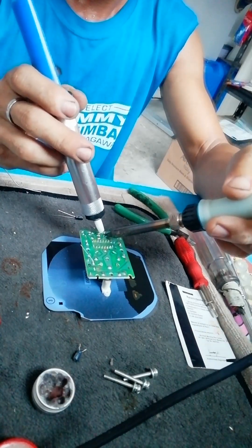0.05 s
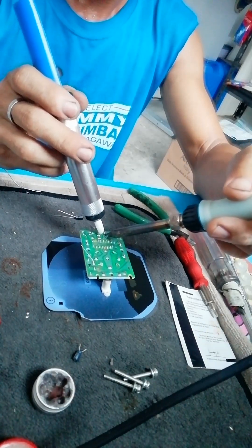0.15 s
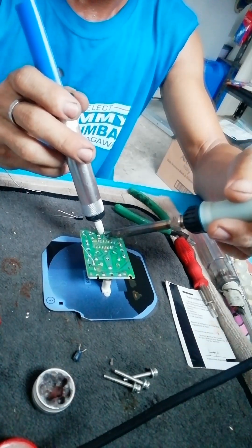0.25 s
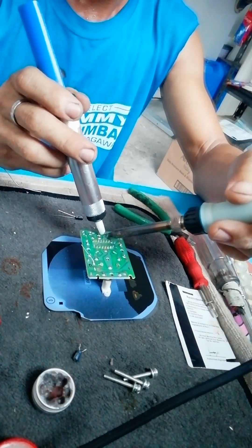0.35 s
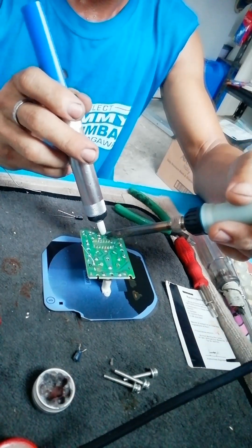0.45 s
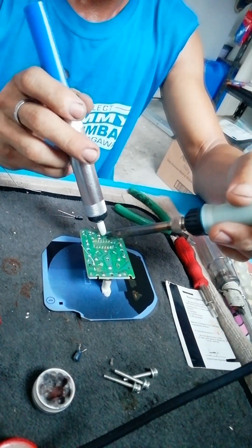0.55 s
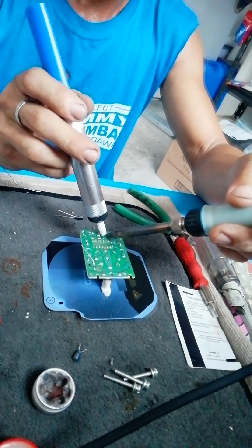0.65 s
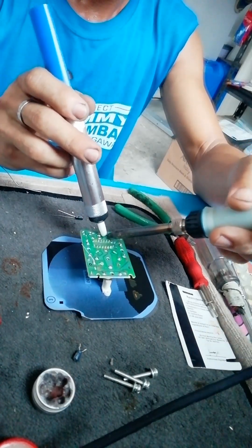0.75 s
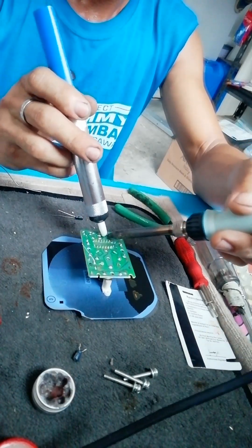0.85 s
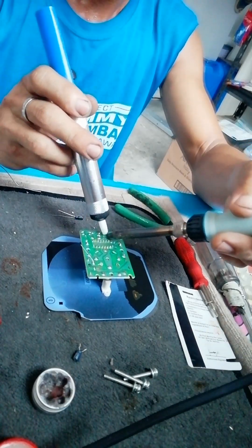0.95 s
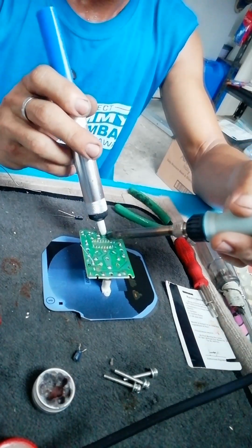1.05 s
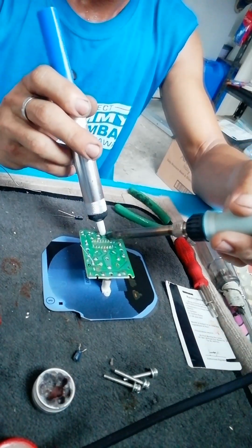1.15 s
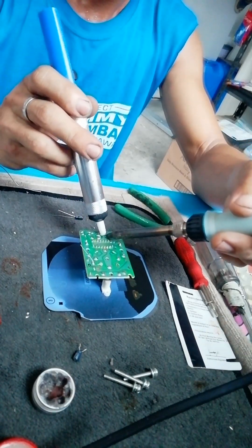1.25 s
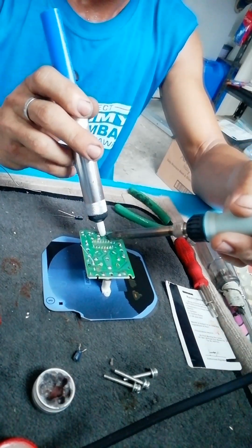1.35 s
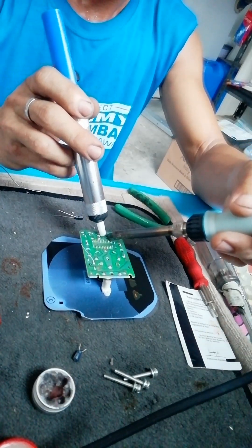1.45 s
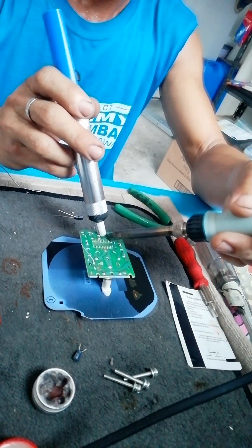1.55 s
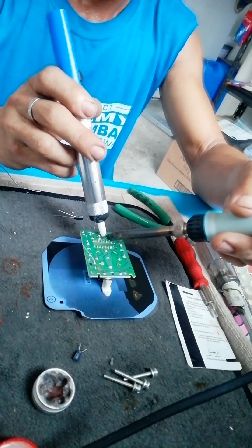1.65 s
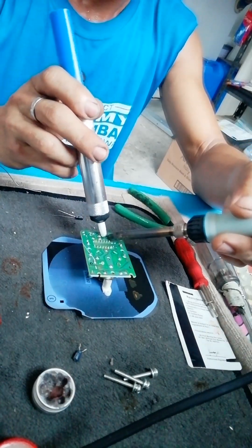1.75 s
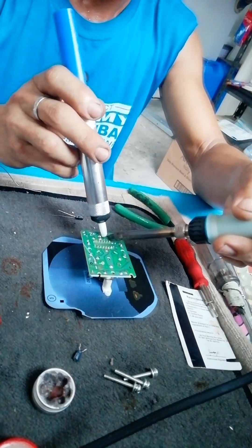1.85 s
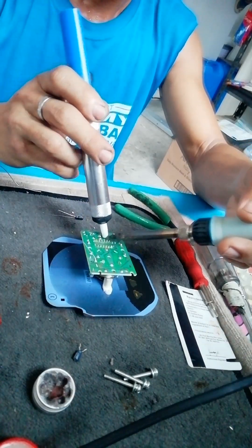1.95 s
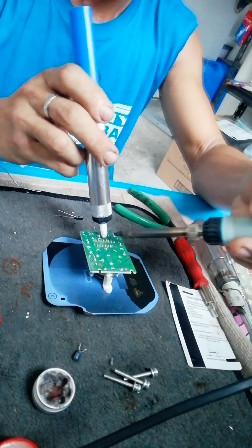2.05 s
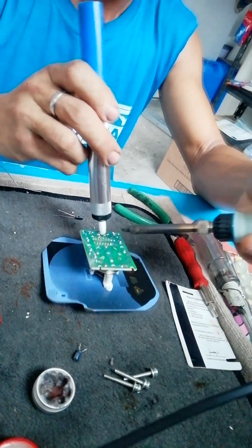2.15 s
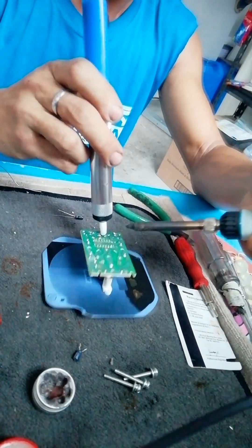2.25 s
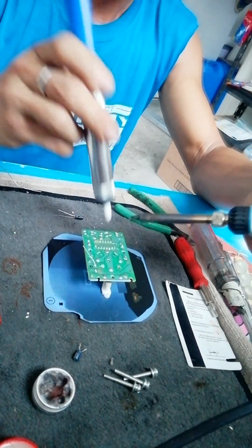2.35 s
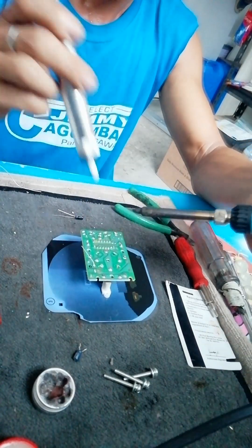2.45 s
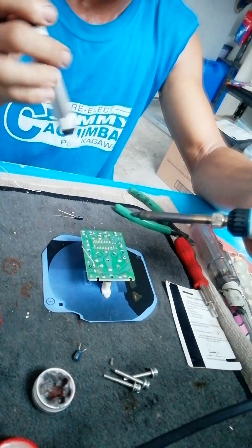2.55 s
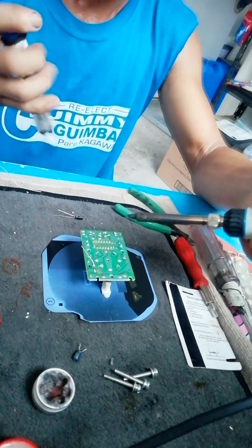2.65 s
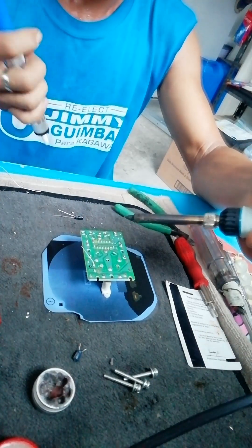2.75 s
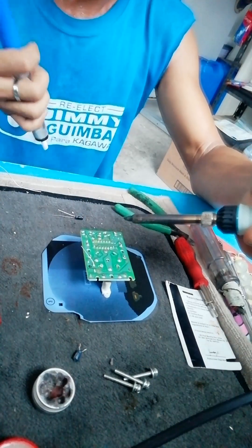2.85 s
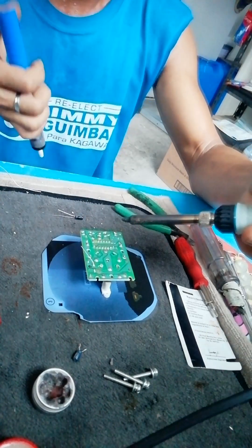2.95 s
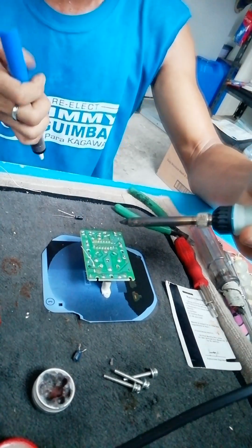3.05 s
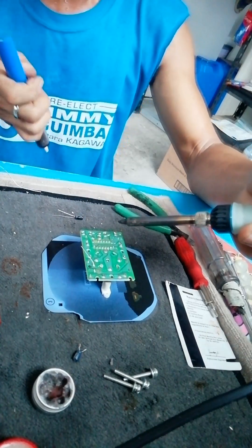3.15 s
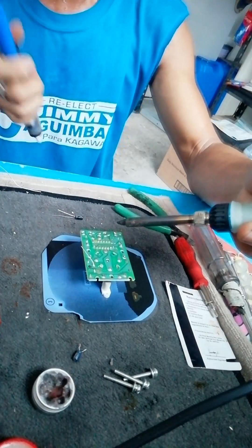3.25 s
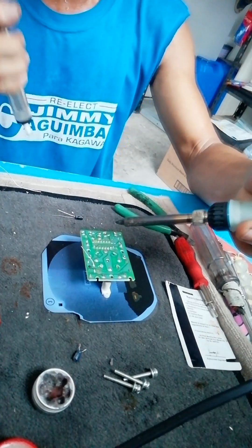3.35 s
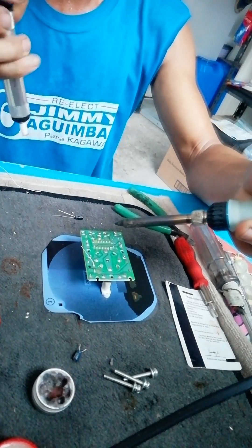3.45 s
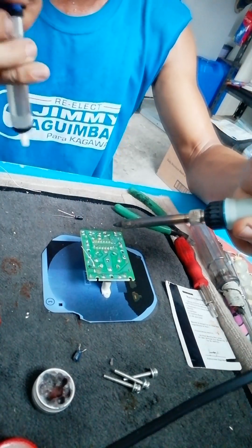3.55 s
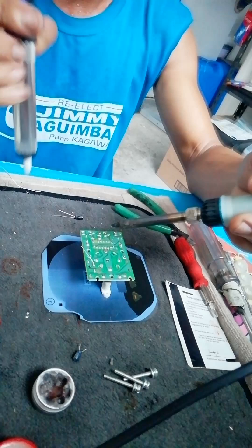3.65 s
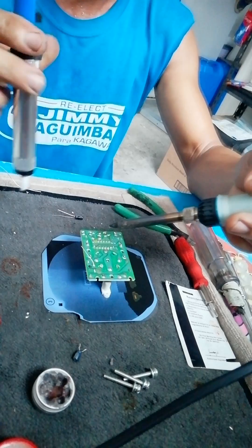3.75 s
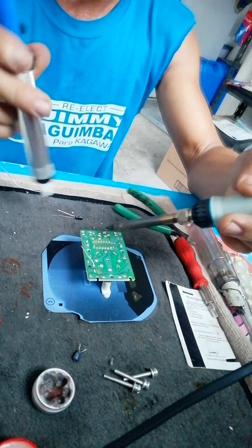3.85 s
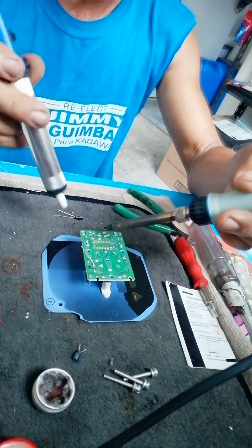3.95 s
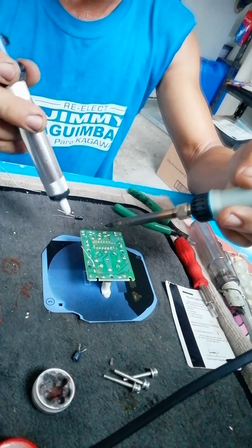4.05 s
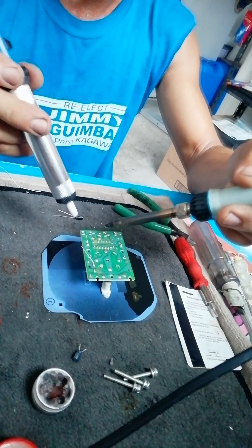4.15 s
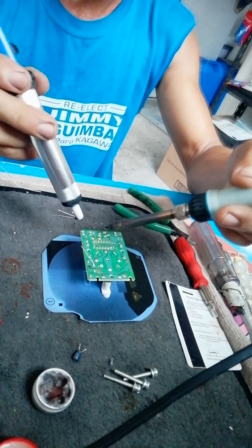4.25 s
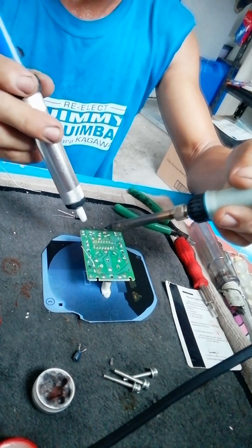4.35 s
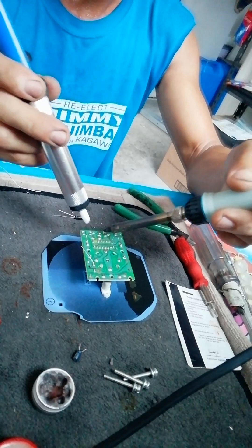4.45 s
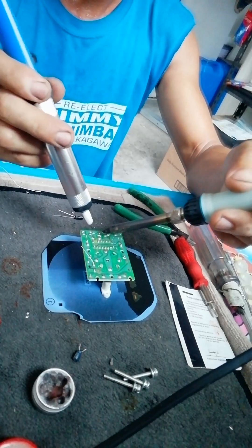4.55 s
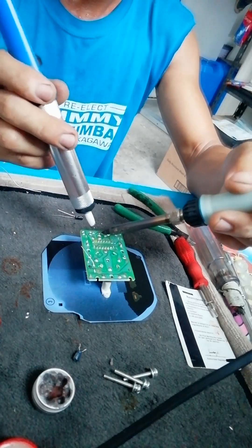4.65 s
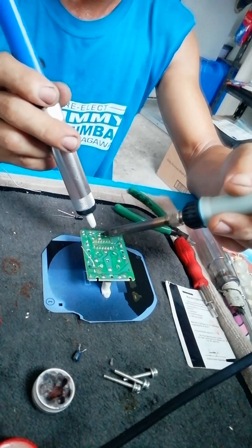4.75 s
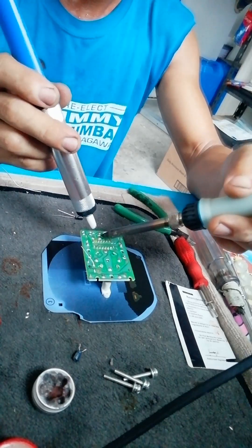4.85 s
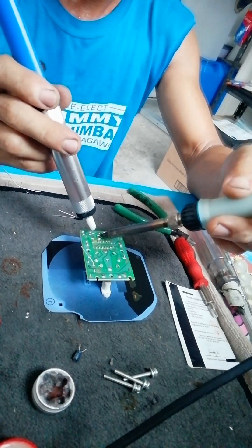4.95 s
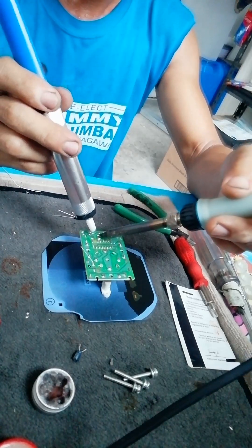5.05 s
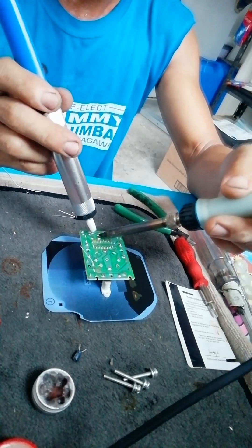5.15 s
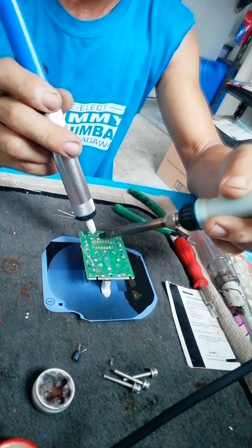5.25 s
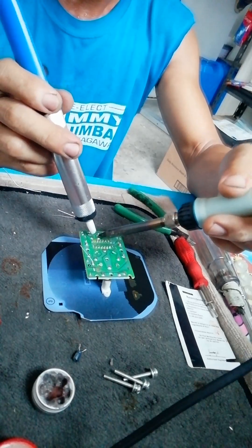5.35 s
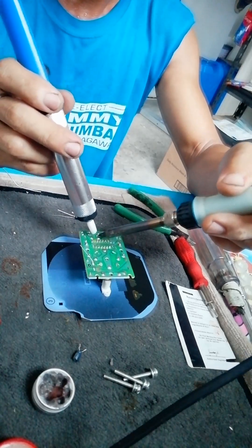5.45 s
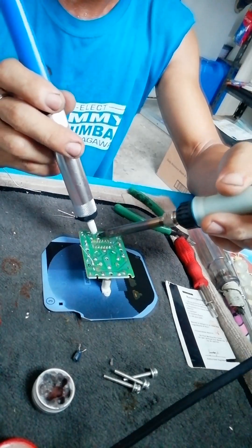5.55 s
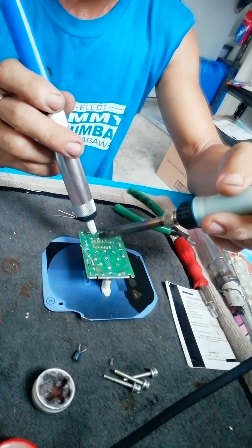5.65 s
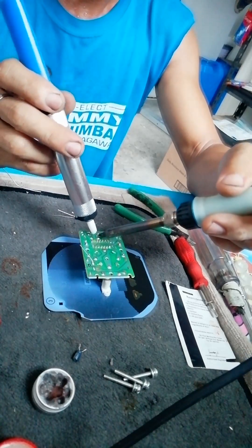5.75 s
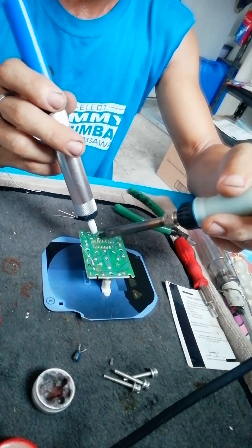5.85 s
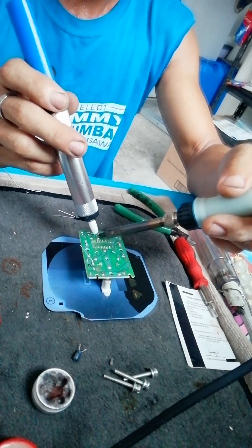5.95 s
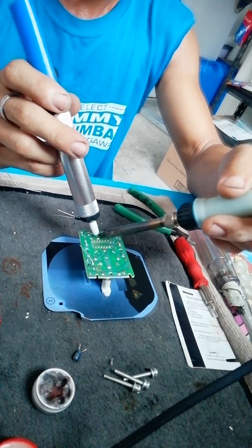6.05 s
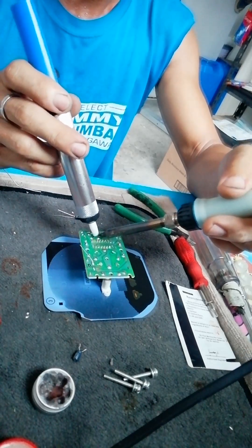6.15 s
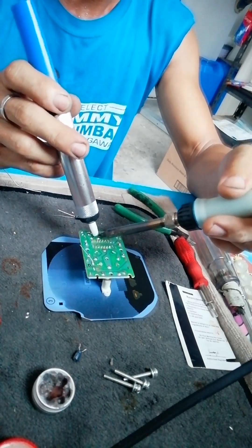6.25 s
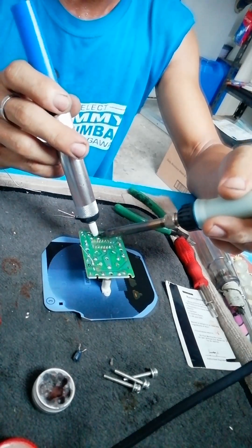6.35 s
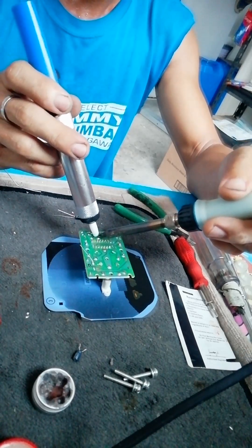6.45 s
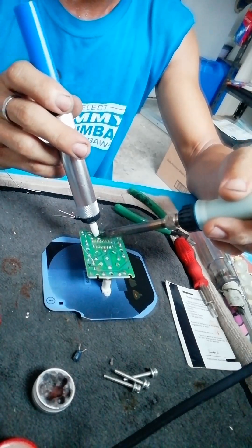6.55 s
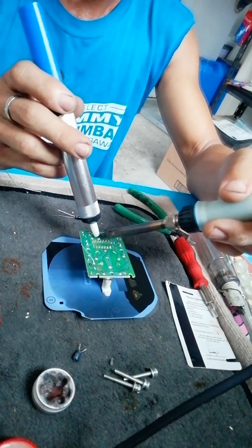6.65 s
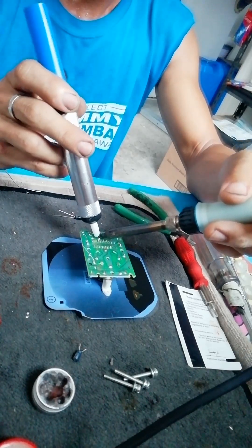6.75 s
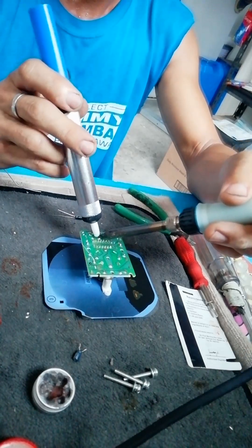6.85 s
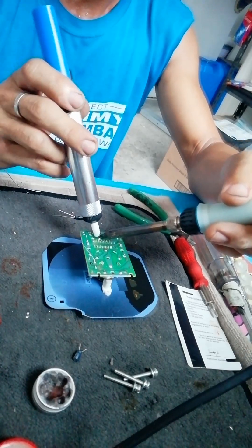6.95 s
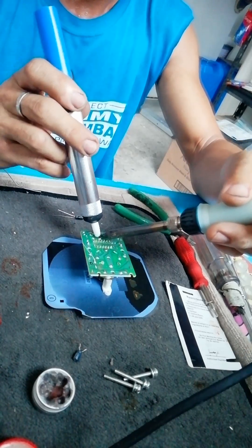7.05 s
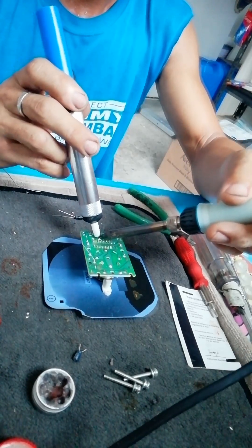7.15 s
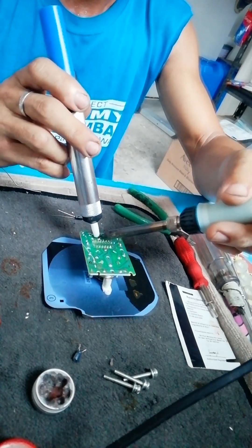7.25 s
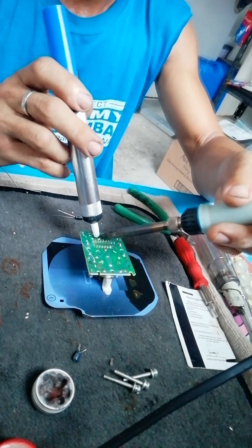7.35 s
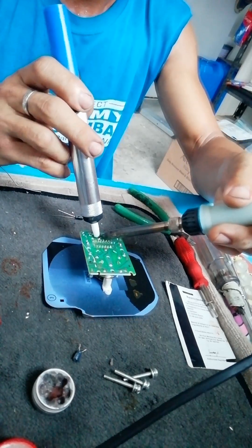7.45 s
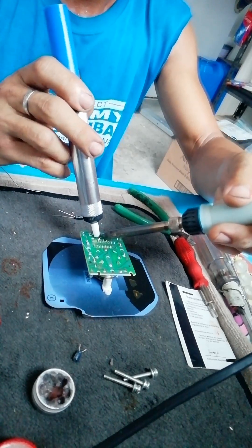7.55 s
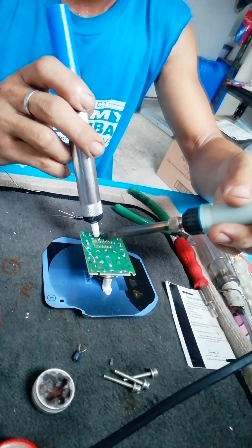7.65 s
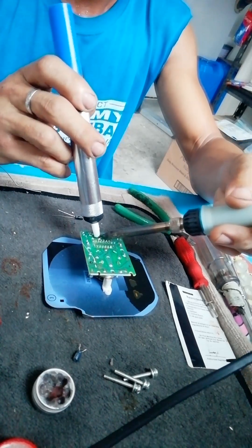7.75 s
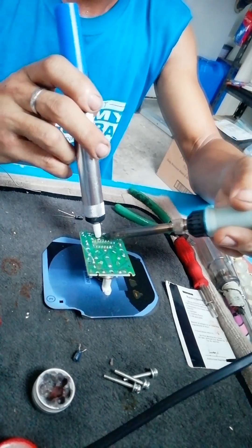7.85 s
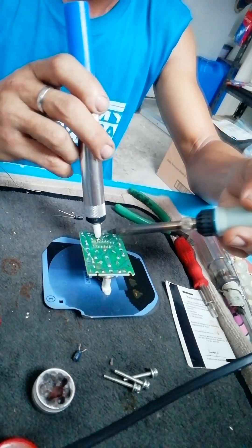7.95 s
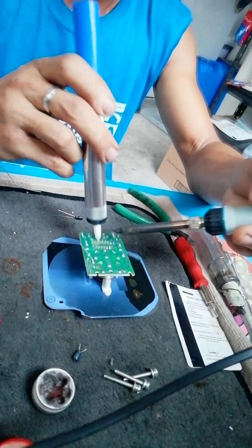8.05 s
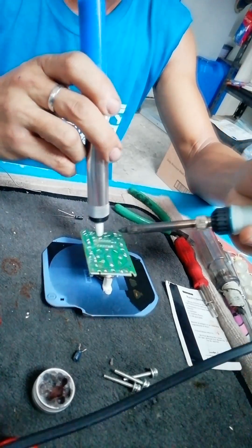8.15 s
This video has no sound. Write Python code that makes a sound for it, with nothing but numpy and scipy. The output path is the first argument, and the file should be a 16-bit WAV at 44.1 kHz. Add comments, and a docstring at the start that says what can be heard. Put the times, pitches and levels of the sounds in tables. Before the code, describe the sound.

A spring pump snaps on a circuit board, gets pushed back into its latch, and snaps once more above a humming, softly scraping fan.

```python
"""A fan whirrs and hums in moving air, in a small hard room; its rub scrapes once a turn over mains hum.
Close to a two-port phone on the workbench, a spring-loaded desoldering pump fires, is cocked and fires again.
Each shot is a rush of friction noise, then hard clicks through metal and circuit-board resonances.
Flux hisses once as shaped noise; bumps of the bench are low decaying swings."""
import sys
import numpy as np
from scipy import signal
from scipy.fft import rfft, irfft, next_fast_len
from scipy.io import wavfile
from scipy.ndimage import uniform_filter1d

SR = 44100
rng = np.random.default_rng(int(sys.argv[2]) if len(sys.argv) > 2 else 0)


def digitize_waveform(pressure):
    """Quantize a signal to 16-bit integers and store it at the path in sys.argv[1].

    Rows of a 2-D input are taken as channels; values are limited to [-1, 1].
    """
    field = np.atleast_2d(pressure).T
    bounded = np.clip(field, -1, 1)
    quanta = np.round(bounded * 32767).astype(np.int16)
    wavfile.write(sys.argv[1], SR, quanta)


N = 361238
TIME = np.arange(N) / SR  # s
BLOW_SIZE = 2 ** 15  # samples in one blow, swing or echo tail
BLOW_TIME = np.arange(BLOW_SIZE) / SR  # s

# Broad resonances of the pump barrel. Each row: centre in Hz, width in Hz, level in dB before the duller top.
BARREL_MODES = [(2170, 160, -12), (3460, 260, 4), (4740, 490, 0.5), (5600, 510, -6), (8400, 2100, -3),
                (9150, 900, -10), (13000, 6100, -14.5)]


def undb(db):
    """Decibels to gain."""
    return 10 ** (np.asarray(db) / 20)


def unit(x):
    """Scale to rms 1."""
    return x / np.sqrt(np.mean(x ** 2))


def bins(size):
    """Frequencies of a spectrum in Hz, kept at 1 or above."""
    return np.maximum(np.fft.rfftfreq(size, 1 / SR), 1)


def shape(points, hz):
    """Gain of a (Hz, dB) curve, drawn straight over log frequency."""
    f, db = np.transpose(points)
    return undb(np.interp(np.log(hz), np.log(f), db))


def resonance(hz, centre, width):
    """Complex response of one resonance, 1 at its centre."""
    return 1 / (1 + 1j * (hz ** 2 - centre ** 2) / (hz * width))


def causal(gain):
    """The minimum-phase response with this gain: nothing sounds before the blow."""
    cepstrum = irfft(np.log(gain + 1e-9))
    half = len(cepstrum) // 2
    return np.exp(rfft(np.r_[cepstrum[0], 2 * cepstrum[1:half], np.zeros(half)]))


def noise(gain_at):
    """Two unrelated noises with the given colour, scaled together to rms 1."""
    size = next_fast_len(N, real=True)
    spectrum = rfft(rng.standard_normal((2, size))) * gain_at(bins(size))
    return unit(irfft(spectrum, size)[:, :N])


def walk(rate):
    """Slow chance with a spread near 1, drawn anew `rate` times a second and smoothed."""
    k = int(SR / rate)
    steps = np.repeat(rng.standard_normal(N // k + 1), k)
    return 1.3 * uniform_filter1d(steps, k)[:N]


def add(out, start, sound):
    """Mix a sound in at a time in seconds."""
    i = int(start * SR)
    out[:, i:i + sound.shape[-1]] += sound[..., :max(N - i, 0)]


def air(level_db=-48.5, swell_db=0.78, lag=.00075, aimed=0.31):
    """Moving air: bass alike in both ports, higher bands wider; a draught from the left reaches the right late."""
    # Colour of the air. Each row: frequency in Hz, relative level in dB per Hz.
    air_colour = [(12, -31), (22, 1), (65, -5.5), (100, -1.5), (150, -10), (220, -12), (340, -17.5),
                  (600, -27.5), (1030, -23), (1650, -23), (2600, -29), (5500, -37), (8700, -37.5),
                  (11000, -47.5), (16000, -52.5)]
    # Stereo width of the air before the draught. Each row: frequency in Hz, side minus mid in dB.
    air_width = [(30, -37), (120, -24), (290, -8.5), (480, 3), (680, 7.5), (1000, -3.5), (1400, -4.5),
                 (2100, 1), (3000, 0), (15000, 0.5)]
    mid = noise(lambda hz: shape(air_colour, hz))
    side = irfft(rfft(mid[1]) * shape(air_width, bins(N)), N)
    draught = noise(lambda hz: shape(air_colour, hz))[0]
    draught = signal.sosfilt(signal.butter(2, 220, "high", fs=SR, output="sos"), draught)
    late = np.roll(draught, int(lag * SR))
    ports = mid[0] + np.array([side, -side]) + aimed * np.array([draught, late])
    return ports * undb(level_db + swell_db * walk(3.03))


def hum(waver_db=2, drift=0.56):
    """Lines of mains and motor: sines that waver a little in level and phase (drift in radians)."""
    # Mains and motor lines. Each row: frequency in Hz, rms level in dB about which it wavers.
    hum_lines = [(46.7, -61.5), (91, -62), (118.6, -54), (328, -70.5), (490, -76.5), (981, -75),
                 (1125, -74), (1577, -77), (1658, -73.5), (1922, -79)]
    out = 0
    for hz, db in hum_lines:
        level = np.sqrt(2) * undb(db + waver_db * walk(4.7))
        out = out + level * np.sin(2 * np.pi * hz * TIME + drift * walk(4))
    return out


def blades(rate_hz=69.9, first_db=-64, db_per_octave=-4, waver_db=2.3, wide_hz=420, count=17):
    """The passing blades hum in overtones; the higher ones reach the two ports out of step."""
    out = 0
    for k in range(1, count):
        hz = k * rate_hz
        apart = np.pi / 3 / (1 + (wide_hz / hz) ** 3) * rng.choice([-1, 1])
        phase = 2 * np.pi * (hz * TIME + rng.random()) + .4 * walk(3)
        level = undb(first_db + db_per_octave * np.log2(k) + waver_db * walk(3))
        out = out + np.sin(phase + np.array([[apart], [-apart]])) * level
    return np.sqrt(2) * out


def fan(turns_per_s=5.85, uneven_db=0.5, wander=0.0117, blur_hz=120, overtone_db=-9, leak_db=-9):
    """Once a turn a dry rub gives one rising and one falling whirr and a scrape, coloured by the housing."""
    # Resonances of the fan housing. Each row: centre in Hz, width in Hz, level in dB.
    housing_modes = [(893, 180, 0.5), (1163, 93, 0.5), (1284, 100, 3), (1578, 84, -1), (1678, 106, -3),
                     (1932, 106, 0.5), (2326, 190, -1.5), (3200, 900, -11.5), (4470, 3000, -16)]
    # Whirrs of each turn. Each row: start in turns, length in turns, from Hz, to Hz, level in dB before the housing.
    whirr_sweeps = [(.55, .88, 1520, 1990, -63), (.25, .68, 1960, 1060, -59.5)]
    scrape_place, scrape_spread, scrape_db = 0.8, .11, -56  # turns, turns, dB at its peak

    def housing(hz):
        power = sum((undb(db) * abs(resonance(hz, f, w)) ** 2) ** 2 for f, w, db in housing_modes)
        return np.sqrt(power)

    turn = turns_per_s * TIME + wander * walk(0.99)
    size, whirr = next_fast_len(N, real=True), 0
    for start, length, from_hz, to_hz, db in whirr_sweeps:
        along = np.minimum((turn - start) % 1 / length, 1)
        tone = np.exp(2j * np.pi * np.cumsum(from_hz + (to_hz - from_hz) * along) / SR)
        # low noise carried on the tone smears it into a band
        blur = signal.hilbert(noise(lambda hz: 1 / (1 + (hz / blur_hz) ** 4)), size)[:, :N]
        band = np.real(blur * (tone + undb(overtone_db) * tone ** 2))
        whirr = whirr + band * np.sqrt(abs(np.sin(np.pi * along))) * undb(db)
    whirr = irfft(rfft(whirr, size) * (housing(bins(size)) + undb(leak_db)), size)[:, :N]
    away = (turn - scrape_place + .5) % 1 - .5
    scrape = noise(housing) * np.exp(-.5 * (away / scrape_spread) ** 2) * undb(scrape_db)
    return (whirr + scrape) * undb(uneven_db * walk(5))


def rumble(centre_hz=52, width_hz=70, rest_db=-66.5, move_db=-51.5):
    """Low noise of the bench top, faint at rest and stronger while the arms move back to the work."""
    start, end, fade = 3.24, 5.04, 0.33  # s
    moving = np.clip(np.minimum(TIME - start, end - TIME) / fade, 0, 1)
    stir = noise(lambda hz: abs(resonance(hz, centre_hz, width_hz)) ** 2)[0]
    return stir * (undb(rest_db) + moving * undb(move_db))


def bench(rise=.011, choke=.008):
    """Bumps reach the phone through the bench as a low swing; each new contact damps the one before."""
    # Soft bumps of hand and iron. Each row: start in seconds, level in dB before the envelope,
    # pitch in Hz, 60 dB decay in seconds.
    bench_bumps = [(1.63, -36, 44, .5), (3.453, -17.5, 81, .22), (3.513, -25, 87, .4),
                   (3.757, -28, 78, .26)]
    out, t = np.zeros((2, N)), BLOW_TIME
    next_starts = [row[0] for row in bench_bumps[1:]] + [np.inf]
    for (s, db, hz, t60), following in zip(bench_bumps, next_starts):
        swing = (1 - np.exp(-t / rise)) * np.exp(-np.log(1000) * t / t60)
        swing *= np.clip((following - s - t) / choke, 0, 1)
        add(out, s, -np.sin(2 * np.pi * hz * t) * swing * undb(db))
    return out


def room(x, level_db=-6, t60=0.26, first_echo=0.0029, build=0.0041, split_hz=9500):
    """Dense echoes of near walls: decaying noise, its treble a little stronger, dying at one rate."""
    echoes = rng.standard_normal((2, BLOW_SIZE))
    low = irfft(rfft(echoes) / (1 + (bins(BLOW_SIZE) / split_hz) ** 4))
    tail = (low + 1.18 * (echoes - low)) * np.exp(-np.log(1000) * BLOW_TIME / t60)
    tail *= np.clip((BLOW_TIME - first_echo) / build, 0, 1)
    tail /= np.linalg.norm(tail, axis=1, keepdims=True)
    return x + undb(level_db) * signal.fftconvolve(x, tail, axes=1)[:, :N]


def flux(peak_s=6.303, peak_db=-43, rise_db_per_s=180, fall_db_per_s=225, sputter_db=2.0):
    """Flux boils up on the hot iron and dies away: a short, slightly sputtering hiss."""
    # Colour of the hiss. Each row: frequency in Hz, relative level in dB per Hz.
    flux_colour = [(800, -34), (1800, -1), (3000, -17.5), (5000, -6.5), (6500, -4), (8000, -2.5),
                   (10000, -14), (13000, -20), (16000, -32)]
    since = TIME - peak_s
    db = peak_db - np.maximum(-since * rise_db_per_s, since * fall_db_per_s)
    return noise(lambda hz: shape(flux_colour, hz)) * undb(db + sputter_db * walk(200))


def contact(length, tilt_db, click=0.41, lag=0.000303):
    """Spectrum of a hard click and its dying clatter; the right port hears the click later."""
    clatter = rng.standard_normal((2, BLOW_SIZE)) * np.exp(-BLOW_TIME / length)
    clatter /= np.linalg.norm(clatter, axis=1, keepdims=True)
    clatter[0, 0] += click
    clatter[1, int(lag * SR)] += click
    octaves = np.log2(np.clip(bins(BLOW_SIZE), 500, 12000) / 4000)
    return rfft(clatter) * causal(undb(tilt_db * octaves))  # tilt in dB per octave


def strike(spectrum, db):
    """A blow whose energy equals that of one millisecond at this level."""
    x = irfft(spectrum)
    return x / np.linalg.norm(x, axis=1, keepdims=True) * np.sqrt(SR / 1000) * undb(db)


def body(modes, hz, low_cut_hz, leak_db, edge_hz=10000, top_db=-5):
    """Gain of a small part: broad resonances, only a weak leak below them, a duller top."""
    peaks = sum(undb(db) ** 2 * abs(resonance(hz, f, w)) ** 2 for f, w, db in modes)
    leak = undb(leak_db) * abs(resonance(hz, 780, 1300))
    gain = np.sqrt(peaks / (1 + (low_cut_hz / hz) ** 8) + leak ** 2)
    return gain * undb(top_db / (1 + (edge_hz / hz) ** 20))


def parts():
    """Responses of barrel, latch, ringing metal and circuit board."""
    # Broad resonances of plunger and latch. Each row: centre in Hz, width in Hz, level in dB before the duller top.
    latch_modes = [(3540, 250, 5.5), (4790, 420, 1.5), (5700, 650, -7.5), (7920, 640, -8), (9160, 580, -5),
                   (13000, 3900, -30)]
    # Ringing of barrel and spring. Each row: frequency in Hz, relative level in dB, 60 dB decay in seconds.
    ring_modes = [(3280, -1, .16), (3820, -9, 0.2), (3560, -13, 0.2), (3960, -8, .22), (4053, -8, .2),
                  (4583, -11, .18), (4770, -3, .27), (5044, -12, .35), (5563, -22, .17), (6400, -16, .2),
                  (7230, -7, .13), (8100, -14, .16), (8565, -4, .15), (9100, -11, .16), (8560, -3, 0.094),
                  (9598, -5, 0.082)]
    # Colour of the circuit board. Each row: frequency in Hz, gain in dB.
    board_colour = [(25, -42), (60, -20), (150, -5), (240, 4), (380, 2), (540, 7), (850, -5), (1100, 3),
                    (1700, -4), (2200, -2.5), (3200, -2.5), (8000, -19), (16000, -38)]
    hz = bins(BLOW_SIZE)
    barrel = causal(body(BARREL_MODES, hz, low_cut_hz=2100, leak_db=-24.5))
    latch = causal(body(latch_modes, hz, low_cut_hz=2930, leak_db=-35))
    ring = sum(undb(db) * resonance(hz, f, np.log(1000) / np.pi / t60) for f, db, t60 in ring_modes)
    return barrel, latch, ring, causal(shape(board_colour, hz))


def friction(grain_db=2.5):
    """Grainy friction in the barrel: resonant noise with a quickly wavering level."""
    def colour(hz):
        return body(BARREL_MODES, hz, low_cut_hz=2400, leak_db=-25.5) * np.sqrt(hz)

    return noise(colour) * undb(grain_db * walk(300))


def swell(end, length, db):
    """A slide gathers speed: its level climbs 20 dB, then it stops."""
    return undb(db - 20 * abs(end - TIME) / length) * (TIME > end - length) * (TIME < end)


def handling(barrel, ring, rub, ring_db=-16):
    """Light metal ticks and soft brushes sound now and then as pump and iron are moved about on the board."""
    # Brushes along fingers and board. Each row: end in seconds, time to swell by 20 dB in seconds,
    # level at the end in dB.
    hand_brushes = [(3.83, .3, -63), (7.25, .08, -55.5)]
    # Light ticks. Each row: start in seconds, level in dB, brightness in dB per octave.
    hand_ticks = [(2.735, -41.5, -2), (2.883, -43.5, -4), (2.975, -45, -3), (3.103, -32, 2), (7.25, -44, 7),
                  (7.703, -47, 9)]
    out = rub * sum(swell(*brush) for brush in hand_brushes)
    metal = barrel + undb(ring_db) * ring
    for s, db, tilt_db in hand_ticks:
        add(out, s, strike(contact(length=.0013, tilt_db=tilt_db, click=0.56) * metal, db))
    return out


def cocking(latch, ring, board, rub, stop_ring_db=1, catch_ring_db=-11):
    """The plunger scrapes down, grinds into its stop and bounces, then slips back into the latch with a thud."""
    stop_s, stop_db, push_s, push_db = 3.1295, -7.5, 0.11, -44
    bounce_s, bounce_db = 0.0094, -15  # after the stop, level against it
    slip_s, slip_db, catch_s, catch_db = 3.2793, -19.5, 3.287, -18.5
    thud_db = -11  # in the hand, against the catch
    slides = swell(stop_s, push_s, push_db) + swell(stop_s, length=0.016, db=-35)
    out = rub * (slides + swell(slip_s, length=.003, db=-36))
    stop, catch = latch + undb(stop_ring_db) * ring, latch + undb(catch_ring_db) * ring
    hand = board * resonance(bins(BLOW_SIZE), centre=360, width=280)
    add(out, stop_s, strike(contact(length=0.0019, tilt_db=-1.8, click=0.65) * stop, stop_db))
    bounce = contact(length=0.0026, tilt_db=1.0, click=.9) * stop
    add(out, stop_s + bounce_s, strike(bounce, stop_db + bounce_db))
    add(out, slip_s, strike(contact(length=0.0097, tilt_db=3.0, click=.3) * catch, slip_db))
    add(out, catch_s, strike(contact(length=0.0032, tilt_db=7, click=0.68) * catch, catch_db))
    thud = contact(length=0.00074, tilt_db=-2, click=1.3, lag=0.0004) * hand
    add(out, catch_s, strike(thud, catch_db + thud_db))
    return out


def firing(barrel, ring, board, rub, ring_db=-13):
    """The piston rushes up, cracks into the barrel and rebounds; the recoil knocks the nozzle on the board twice."""
    # Shots of the pump. Each row: crack time in seconds, crack level in dB, level in dB of the jolt through
    # the nozzle, delay of the recoil in seconds, recoil knock level in dB.
    pump_shots = [(2.1979, -8.5, -30, .0117, -15), (8.1404, -10.5, -23, .0131, -21)]
    rush_s, rush_db = 0.0056, -10  # time to swell by 20 dB; end level against the crack
    rebound_s, rebound_db = .0018, -4  # from the end of the barrel, level against the crack
    rattle_db, settle_s, settle_db = -.5, .0035, -3  # levels against the knock
    out, metal = np.zeros((2, N)), barrel + undb(ring_db) * ring
    for s, db, jolt_db, delay, knock_db in pump_shots:
        out += rub * swell(s, rush_s, db + rush_db)
        add(out, s, strike(contact(length=0.0025, tilt_db=-2.5, click=0.68) * metal, db))
        add(out, s, strike(contact(length=0.0018, tilt_db=4) * board, jolt_db))
        rebound = contact(length=0.0019, tilt_db=3.0, click=0.51) * metal
        add(out, s + rebound_s, strike(rebound, db + rebound_db))
        knock = contact(length=0.0036, tilt_db=0.7, click=0.72, lag=0.00051) * board
        add(out, s + delay, strike(knock, knock_db))
        rattle = contact(length=0.01, tilt_db=6.0, click=0.42) * metal
        add(out, s + delay, strike(rattle, knock_db + rattle_db))
        settle = contact(length=0.0074, tilt_db=2.5, click=0.53, lag=0.00058) * board
        add(out, s + delay + settle_s, strike(settle, knock_db + settle_db))
    return out


def scene():
    """Pump, flux and fan rub sound in their room, over bench, hum, blades and air."""
    barrel, latch, ring, board = parts()
    rub = friction()
    pump = firing(barrel, ring, board, rub) + cocking(latch, ring, board, rub) + handling(barrel, ring, rub)
    return room(pump + flux() + fan()) + bench() + rumble() + hum() + blades() + air()


def record(dry, top_hz=15900):
    """The phone stops at full scale and cuts the top with a steep low-pass."""
    low_pass = signal.ellip(10, .2, 70, top_hz, fs=SR, output="sos")
    return signal.sosfilt(low_pass, np.clip(dry, -1, 1))


dry = scene()
out = record(dry)
digitize_waveform(out)
```